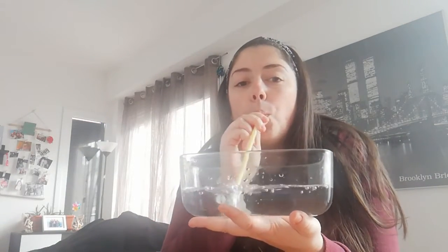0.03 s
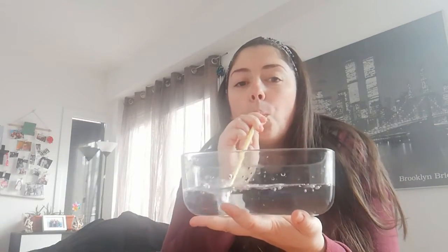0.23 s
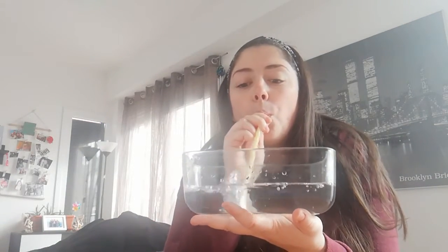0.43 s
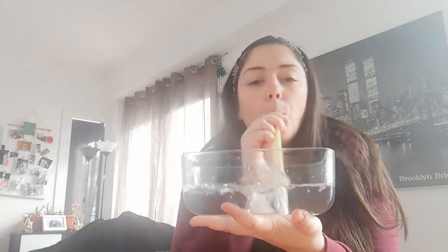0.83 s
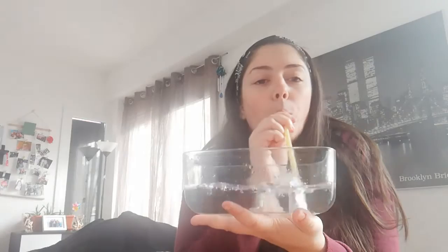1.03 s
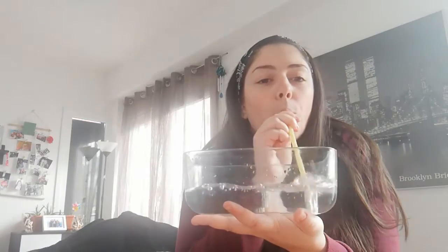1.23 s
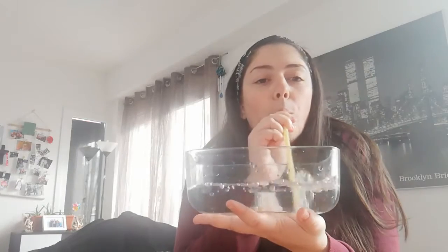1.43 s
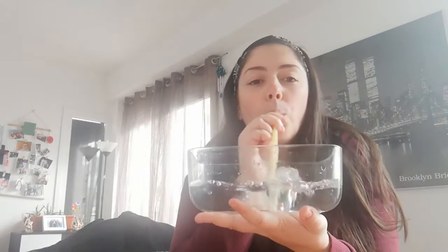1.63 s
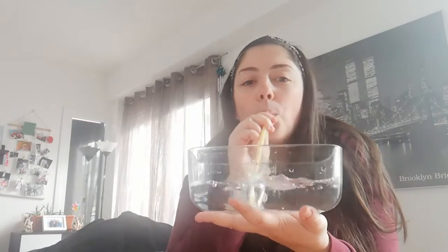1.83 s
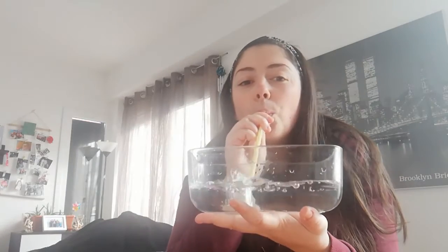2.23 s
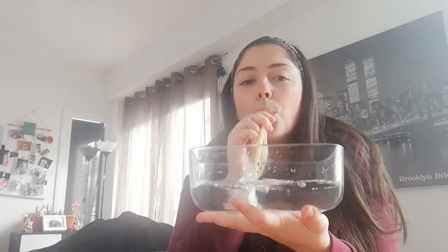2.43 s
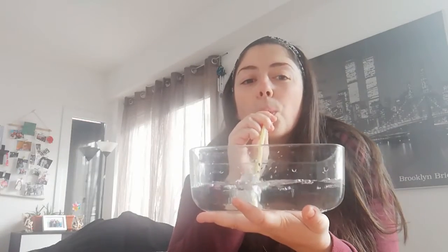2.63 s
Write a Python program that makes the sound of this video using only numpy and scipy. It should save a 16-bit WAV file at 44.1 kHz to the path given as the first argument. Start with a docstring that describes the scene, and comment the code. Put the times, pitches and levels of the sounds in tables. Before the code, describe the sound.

Bubbles blown through a straw gurgle in a bowl of water, with small splashes and ticks.

```python
"""A small living room, a stereo microphone at arm's length from a glass bowl of water with a straw in it.
From the start, air leaves the straw in big bubbles, each a low thump and a wet slap; many gulp upward in
pitch as they open at the surface. At 0.2 s the straw ticks sharply on the glass, then now and again.
The bubbling is strongest from 0.6 s to about 2 s, and eases before the last bubble at 2.7 s.
All the while tiny bubbles plink, spray crackles and the bowl rings faintly."""
import sys
import numpy as np
from scipy import signal
from scipy.fft import rfft, irfft
from scipy.io import wavfile
from scipy.ndimage import uniform_filter1d

SR = 44100
rng = np.random.default_rng(int(sys.argv[2]) if len(sys.argv) > 2 else 0)


def wav_record(signal):
    """Record a signal, one row per channel, as 16-bit PCM in the file named by sys.argv[1]."""
    frames = np.transpose(np.atleast_2d(signal))
    bounded = np.clip(frames, -1, 1)
    # unit amplitude maps onto the largest positive 16-bit level
    quanta = np.round(bounded * 32767).astype(np.int16)
    wavfile.write(sys.argv[1], SR, quanta)


N = 123479

# Levels in the tables are relative: each source adds its own trim.
# big bubbles leaving the straw (time [s], thump [dB], low slap [dB], high slap [dB])
RELEASES = [(0.06, -45, -37, -69), (0.099, -55, -70, -66), (0.149, -69, -55, -49.5),
            (0.236, -48.5, -53, -50.5), (0.31, -50, -50, -43), (0.366, -58, -42, -49),
            (0.412, -56, -57, -46.5), (0.45, -48.5, -40, -44), (0.502, -43.5, -33, -46),
            (0.549, -41, -44, -51), (0.602, -39.5, -27, -28.5), (0.663, -34.5, -25.5, -29),
            (0.729, -40.5, -24, -38.5), (0.772, -37, -40, -37), (0.848, -43.5, -27.5, -68),
            (0.927, -38, -28.5, -93), (0.997, -40, -31.5, -33), (1.073, -41.5, -25, -58),
            (1.125, -38.5, -54, -39), (1.205, -44.5, -43, -44), (1.265, -39, -21, -30),
            (1.315, -39, -53, -33.5), (1.369, -47.5, -29, -53), (1.402, -42, -27.5, -34.5),
            (1.452, -41, -36, -38.5), (1.494, -52, -48, -47.5), (1.57, -42, -36, -64),
            (1.601, -47, -26.5, -78), (1.671, -42.5, -34.5, -85), (1.716, -36, -23, -45.5),
            (1.782, -37, -31, -34.5), (1.837, -44.5, -61, -41), (1.918, -43, -33.5, -55),
            (1.997, -57, -35.5, -78), (2.04, -50.5, -43, -44.5), (2.104, -47.5, -48, -50),
            (2.131, -43.5, -33, -40), (2.167, -42.5, -44.5, -55), (2.241, -35.5, -32, -37.5),
            (2.278, -45.5, -49, -54), (2.338, -43.5, -61, -46), (2.375, -49, -63, -42.5),
            (2.424, -45.5, -62, -49), (2.472, -53, -46, -49), (2.53, -47.5, -47, -40.5),
            (2.59, -48.5, -71, -43.5), (2.619, -62, -66, -47), (2.649, -58, -68, -73),
            (2.703, -55, -43, -45.5)]
# resonances of the thump (frequency [Hz], level [dB], t60 [s])
THUMP_MODES = [(215.6,1.5,0.13),(249.2,6.5,0.053),(527,-7,0.015)]
# spectra of the low and the high slap (frequency [Hz], level [dB])
LOW_SLAP = [(150,-41),(400,-1),(570,4.5),(750,12),(1100,-3),(1600,-21),(2200,-33),(8000,-72)]
HIGH_SLAP = [(200,-27.5),(700,-0.5),(1300,12),(1650,5.5),(2100,0),(3500,-14),(6000,-11.5),(12000,-30)]
# bubbles opening at the surface (time [s], level [dB], starting pitch [Hz], t60 [s], rise [octaves])
GULPS = [(0.2855,-15.5,1118,0.012,0.41),(0.356,-30.5,1247,0.026,0.29),(0.452,-28.5,1183,0.021,0.2),(0.504,-29,1264,0.032,0.18),
         (0.6022,-7,1313,0.013,0.12),(0.613,-20,1545,0.022,0.32),(0.662,-14.5,1240,0.016,0.26),(0.729,-24.5,711,0.036,0.29),(0.776,-51,780,0.016,0.27),
         (0.8475,-18,596,0.02,0.74),(0.928,-21.5,1123,0.017,0.24),(0.9365,-20.5,890,0.024,0.43),(0.997,-46,740,0.014,0.2),(1.0755,-20.5,649,0.03,0.79),
         (1.2635,-18.5,728,0.013,0.23),(1.273,-17,890,0.03,0.23),(1.366,-34.5,950,0.034,0.3),(1.4025,-27,750,0.02,0.36),(1.571,-32,495,0.043,0.29),
         (1.604,-27,685,0.032,0.61),(1.673,-29,453,0.032,0.13),(1.685,-31.5,508,0.025,0.3),(1.7195,-20.5,692,0.03,0.61),(1.782,-45,800,0.016,0.31),
         (1.9337,-18.5,962,0.031,0.57),(1.998,-37,796,0.055,0.34),(2.028,-31.5,826,0.018,0.37),(2.122,-42,2050,0.031,0.26),(2.131,-32.5,1226,0.025,0.19),(2.2415,-28,1094,0.026,0.47),(2.3395,-24.5,1000,0.019,0.36),
         (2.374,-29,1160,0.02,0.24),(2.376,-40,2000,0.041,0.16),(2.419,-42,2200,.025,.15),(2.481,-34,1147,0.027,0.24),(2.503,-40,1540,0.046,0.14),
         (2.528,-24,1247,0.03,0.81),(2.705,-37,401,0.026,0.26)]
# straw on glass, by group of modes (time [s], lowest [dB], second [dB], middle [dB], upper [dB], top [dB])
TICKS = [(0.0981, -50, -33.5, -50, -42, -50), (0.2008, -30, -20.5, -38.5, -51, -29.5),
         (0.5001, -22, -40, -66, -50, -47), (0.6601, -33.5, -42, -53, -62, -42.5),
         (1.1962, -27, -44, -50, -49, -51), (2.2414, -33, -38, -44, -57, -47)]
# borders between those groups (frequency [Hz])
GROUP_EDGES_HZ = [3000, 4000, 6000, 8250]
# modes of straw and glass (frequency [Hz], level [dB], base t60 [s], detuning by sloshing water [share])
TICK_MODES = [(2308,-19,0.12,0.0143),(2772,-3,0.075,0.0043), (3394,0,.04,0),(3500,-7,.012,.02),
              (4840,-12.5,0.057,0.0071),(4870,11,0.027,0.002),(5100,-37,0.019,0.034),
              (7900,7,0.032,0.024),(8550,-14,0.038,0.0054),(8890,0,0.024,0.0375),(9340,-6,0.021,0),(10150,0,0.0086,0.0084)]
# spectrum of the crack at contact (frequency [Hz], level [dB])
CRACK = [(2000,-43),(3500,12),(6000,3),(8800,6),(10300,1),(11000,-2),(15500,-9)]
# tiny bubbles bursting (time [s], level [dB], mid-chirp pitch [Hz], t60 [s])
PLINKS = [(0.06, -41.5, 5170, 0.032), (0.2004, -11.5, 10050, 0.0056), (0.202, -20.5, 8650, 0.026),
          (0.2811, -37, 3497, 0.043), (0.4113, -44, 6440, 0.016), (0.4552, -31.5, 3380, 0.025),
          (0.5481, -35, 3420, 0.027), (0.6267, -31.5, 3320, 0.018), (0.663, -35, 4490, 0.023),
          (0.724, -40, 8060, 0.063), (0.7762, -34, 7500, 0.018), (0.7777, -24, 3370, 0.016),
          (0.7848, -42.5, 4800, 0.037), (0.8375, -43.5, 3515, 0.041), (1.0009, -43.5, 4880, 0.026),
          (1.0846, -36.5, 8040, 0.026), (1.083, -40.5, 7700, 0.019), (1.1997, -41, 7900, 0.025),
          (1.227, -40, 7070, 0.035), (1.3294, -37, 8300, 0.027), (1.4491, -34, 3393, 0.025),
          (1.45, -47, 4590, 0.031), (1.4956, -36, 3360, 0.025), (1.4982, -28, 8200, 0.018),
          (1.56, -38, 7060, 0.039), (1.7346, -41.5, 3500, 0.027), (1.7936, -38.5, 3460, 0.02),
          (1.841, -32.5, 3540, 0.013), (1.8415, -30.5, 8140, 0.014), (1.9278, -40, 5040, 0.015),
          (2.0475, -46, 7890, 0.043), (2.0974, -39.5, 7900, 0.036), (2.13, -43, 3420, 0.048),
          (2.1636, -38.5, 3340, 0.026), (2.2416, -36, 4750, 0.018), (2.2788, -37.5, 8100, 0.026),
          (2.3716, -39.5, 4820, 0.026), (2.3724, -53, 3400, 0.019), (2.418, -40, 3260, 0.045),
          (2.4367, -45, 6070, 0.03), (2.4731, -44.5, 6450, 0.033), (2.5853, -40, 3430, 0.029),
          (2.6026, -41.5, 8000, 0.035), (2.6194, -43, 3430, 0.037), (2.647, -33, 3300, 0.014),
          (2.7036, -40, 3640, 0.015)]
# spray landing (time [s], high treble [dB], low treble [dB])
SPATTERS = [(0.056, -41, -42), (0.1976, -27, -36), (0.4035, -44, -43), (0.5122, -39, -52),
            (0.663, -30, -42), (0.7874, -41, -44), (1.0015, -37.5, -52.5), (1.215, -37, -48),
            (1.264, -35.5, -59), (1.314, -31.5, -42), (1.368, -42, -69), (1.449, -37.5, -39),
            (1.495, -43.5, -46), (1.673, -38.5, -46), (1.786, -43, -45), (1.833, -33, -39.5),
            (1.97, -35, -84), (2.164, -34.5, -44.5), (2.243, -45, -62), (2.2702, -37.5, -38),
            (2.3696, -41, -43), (2.424, -44, -41), (2.474, -39.5, -47), (2.522, -40.5, -75),
            (2.604, -42, -43), (2.643, -46, -45.5), (2.704, -42, -51.5)]
# spectra of its low and high treble (frequency [Hz], level [dB])
SPATTER_LOW = [(1500,2),(3000,9.5),(4900,9.5),(6500,3.5),(8000,-10),(12000,-32)]
SPATTER_HIGH = [(3000,-42),(6500,-13),(8200,3.5),(9300,5),(10300,-6),(11000,-9),(15000,-27)]
# course of the fizz and the falling drops (time [s], level [dB])
SPRAY_LEVEL = [(0.0, -46.5), (0.08, -53), (0.46, -54.5), (0.65, -55.5), (0.83, -60.5), (1.04, -59.5),
               (1.18, -50.5), (1.41, -52.5), (1.61, -61), (1.8, -55.5), (2.2, -60.5), (2.34, -53),
               (2.52, -55.5), (2.7, -53.5), (2.8, -88)]
# spectra of the fizz and of the drops (frequency [Hz], level [dB])
FIZZ = [(1180, -6), (2000, 4.5), (2590, -11), (2680, -5), (2790, 4), (3020, -6.5), (3400, 6), (3940, -6.5),
        (4750, -0.5), (5450, -5), (7480, 3), (8080, 4.5), (9110, 1), (10800, -17), (15500, -25)]
DROPS = [(2500,10),(3400,2.5),(6000,0),(8500,-1.5),(10000,-19),(11500,-8),(15000,-36)]
# course of the crowd of small bubbles (time [s], level [dB])
CHURN_LEVEL = [(0.0, -44), (0.3, -103), (0.41, -53.5), (0.58, -38), (0.68, -35.5), (0.8, -45.5),
               (1.06, -50), (1.64, -57.5), (1.85, -39.5), (2.07, -56.5), (2.24, -37), (2.44, -44.5),
               (2.67, -46.5), (2.8, -59.5)]
# spectrum of that crowd (frequency [Hz], level [dB])
CHURN = [(400,-6.5),(700,-2),(1000,-6.5),(1350,2.5),(1800,-8.5),(2600,0),(4000,-20.5)]
# the bowl's modes, shaken by the water (frequency [Hz], level [dB], t60 [s])
BOWL_MODES = [(561,-8,0.092),(739.5,-0.5,0.19), (909,-2,.55),
              (1180,-34,0.37),(1176,-49,0.099),(1323,-7.5,0.26),(1300,-2,0.36),(1380,-40,0.18),(1500,-27,0.073),(1643,-37,0.11),(1914,-13.5,0.22)]
# echoes off near walls (left delay [s], left level [dB], right delay [s], right level [dB])
ECHOES = [(.0042,-10,0.0036,-9.5),(.0092,-12.5,0.0088,-2.5),(0.0143,-8.5,0.017,-16.5),(0.022,-12.5,0.02,-12.5)]
# decay of the room's tail (frequency [Hz], t60 [s])
ROOM_T60 = [(200,0.23),(800,0.45),(2000,0.21),(6000,0.34),(14000,0.27)]
# spectra of the tail and of the room tone (frequency [Hz], level [dB])
ROOM_TAIL = [(120,-51),(250,-10),(600,0),(1300,-2.5),(3000,-2),(8000,-.5),(14000,-1)]
ROOM_TONE = [(20,1),(55,0),(120,-4),(300,-1),(1000,-67),(4000,-32),(15000,-27)]

SIDES = np.array([[1], [-1]])  # left, right
SIDE_LAG_S = .00002  # scale of the random lag between the channels


def releases():
    """Each bubble breaks off the straw with a short low thump, and the water slaps shut behind it."""
    s, thump_db, low_db, high_db = np.transpose(RELEASES)
    t = np.arange(SR // 6) / SR
    attack_s, low_cut_hz = 0.00099, 195.6
    thump = sum(amp(db - 60 * t / t60) * np.sin(2 * np.pi * hz * t) for hz, db, t60 in THUMP_MODES)
    thump *= 1 - np.exp(-t / attack_s)
    out = signal.fftconvolve(clicks(s, amp(thump_db - 2.5)), thump)[:N]
    for db, spectrum in ((low_db - 7, LOW_SLAP), (high_db, HIGH_SLAP)):
        out += bursts(s, db, spectrum, attack_s=0.00086, decay_s=0.0081)[0]
    return signal.sosfilt(signal.butter(4, low_cut_hz, "high", fs=SR, output="sos"), out)


def gulps():
    """An opening bubble rings briefly while its pitch climbs and its level flutters."""
    out, t = np.zeros(N + SR), np.arange(SR // 8) / SR
    attack_s, rise_s, overtone_ratio = 0.0024, 0.013, 1.7
    for s, db, hz, t60, octaves in GULPS:
        pitch = hz * 2 ** (octaves * (1 - np.exp(-t / rise_s)))
        phase = 2 * np.pi * np.cumsum(pitch) / SR
        flutter_db = 1.8 * flicker(span_s=.004, size=len(t))
        envelope = (1 - np.exp(-(t / attack_s) ** 2)) * amp(db + 3 - 60 * t / t60 + flutter_db)
        i = int(s * SR)
        out[i:i + len(t)] += envelope * (np.sin(phase) + amp(-30.5) * np.sin(overtone_ratio * phase))
    return out[:N]


def straw_ticks():
    """The straw cracks against the glass and rings the modes, which radiate unevenly to the two sides."""
    s, *group_db = np.transpose(TICKS)
    hz, db, t60, wander = np.transpose(TICK_MODES)
    attack_s, typical_db, db_per_doubling, pan_spread_db = 0.0019, -36, 22, 1.5
    levels = np.array(group_db)[np.searchsorted(GROUP_EDGES_HZ, hz)].T + db + 2.5
    chance = rng.standard_normal((len(s), 4, len(hz)))
    out, t = np.zeros((2, N + SR)), np.arange(SR // 6) / SR
    for start, level, (pan, lag, detune, phase) in zip(s, levels, chance):
        # after a harder knock the steady modes ring longer; the water keeps the others short
        ring_s = t60 * 2 ** ((wander == 0) * (level.max() - typical_db) / db_per_doubling)
        envelopes = amp(-60 * t / ring_s[:, None]) * (1 - np.exp(-t / attack_s))
        pitch = hz * (1 + wander * detune)
        i = int(start * SR)
        for channel, side in enumerate((1, -1)):
            lagged_t = t + side * SIDE_LAG_S * lag[:, None]
            waves = np.sin(2 * np.pi * pitch[:, None] * lagged_t + np.pi * phase[:, None])
            out[channel, i:i + len(t)] += amp(level + side * pan * pan_spread_db / 2) @ (envelopes * waves)
    crack_db = typical_db + 1.13 * (group_db[-1] - typical_db) + 9.5  # follows the top group
    return out[:, :N] + bursts(s, crack_db, CRACK, attack_s=.0004, decay_s=.002, channels=2)


def plinks():
    """Tiny bubbles burst at the surface, each a short, rough upward chirp a little to one side."""
    out, t = np.zeros((2, N + SR)), np.arange(SR // 16) / SR
    attack_s, rise_octaves, rise_s, pan_spread_db = 0.0011, .13, .005, 2.5
    glide = 2 ** (rise_octaves * (.5 - np.exp(-t / rise_s)))
    for (s, db, hz, t60), (pan, lag) in zip(PLINKS, rng.standard_normal((len(PLINKS), 2))):
        flutter_db = 3.5 * flicker(span_s=.0008, size=len(t))
        envelope = (1 - np.exp(-(t / attack_s) ** 2)) * amp(db + 3.5 - 60 * t / t60 + flutter_db)
        phase = 2 * np.pi * hz * (np.cumsum(glide) / SR + SIDES * SIDE_LAG_S * lag / 2)
        i = int(s * SR)
        out[:, i:i + len(t)] += amp(SIDES * pan * pan_spread_db / 2) * envelope * np.sin(phase)
    return out[:, :N]


def spatters():
    """Thrown-up water lands as a brief shower of tiny wet specks."""
    s, high_db, low_db = np.transpose(SPATTERS)
    out = 0
    for db, spectrum in ((low_db - 2, SPATTER_LOW), (high_db - 7, SPATTER_HIGH)):
        shower = np.array([wet_specks(per_s=9000, spread_db=2.5) for _ in range(2)])
        out += swell(s, db, attack_s=0.0006, decay_s=0.013) * coloured(shower, spectrum)
    return out


def fizz():
    """Bursting films and fine spray, scattered across the surface in clumps."""
    left, right, middle = (wet_specks(per_s=8000 / 3, spread_db=2.6) for _ in range(3))
    clumps = amp(2.2 * flicker(span_s=.012, size=N))
    specks = np.array([left + middle, right + middle]) * clumps
    return coloured(specks, FIZZ) * amp(in_time(SPRAY_LEVEL) - 2.5)


def droplets():
    """Drops of spray fall back and ping, each at its own pitch."""
    pings = crowd(np.geomspace(2600, 14000, num=36), DROPS, per_s=400, cycles=32, spread_db=11)
    return pings * amp(in_time(SPRAY_LEVEL) - 7.5)


def churn():
    """A crowd of small, quiet bubbles rings beneath the big ones."""
    bubbles = crowd(np.geomspace(450, 3600, num=24), CHURN, per_s=300, cycles=7.6, spread_db=3)
    return bubbles * amp(in_time(CHURN_LEVEL) - 11.5)


def bowl():
    """Every bubble off the straw rings the glass walls faintly, more so after a harder thump."""
    s, thump_db = np.transpose(RELEASES)[:2]
    typical_thump_db, follow_share = -33, 0.57
    level = -49 + follow_share * (thump_db - typical_thump_db)
    scatter_db = 2 * rng.standard_normal((len(s), len(BOWL_MODES))).T
    return sum(ring(clicks(s, amp(level + db + scatter)), hz, t60)
               for scatter, (hz, db, t60) in zip(scatter_db, BOWL_MODES))


def living_room(x):
    """The microphone hears the direct sound, echoes off near walls and a tail that dies band by band."""
    t, onset_s = np.arange(SR // 2) / SR, 0.0073
    response, early = np.zeros((2, 2, len(t)))
    edges_hz = np.geomspace(90, 18000, num=14)
    for low, high in zip(edges_hz, edges_hz[1:]):
        hz = np.sqrt(low * high)
        band = signal.butter(2, [low, high], "band", fs=SR, output="sos")
        noise = signal.sosfilt(band, rng.standard_normal((2, len(t))))
        tail = noise * amp(-60 * t / at_hz(ROOM_T60, hz)) * (1 - np.exp(-(t / onset_s) ** 2))
        unity_gain = np.sqrt(2 * (high - low) / SR / np.sum(tail ** 2, axis=1, keepdims=True))
        response += tail * unity_gain * amp(at_hz(ROOM_TAIL, hz))
    for left_s, left_db, right_s, right_db in ECHOES:
        early[0, int(left_s * SR)] += amp(left_db)
        early[1, int(right_s * SR)] += amp(right_db)
    response += signal.sosfilt(signal.butter(1, 400, "high", fs=SR, output="sos"), early)
    return x + signal.fftconvolve(x, response, axes=1)[:, :N]


def room_tone():
    """The room's low, quiet background, almost the same in both channels."""
    mid, side = coloured(rng.standard_normal((2, N)), ROOM_TONE)
    return amp(-66.5) * (mid + amp(-39) * side * SIDES)


def amp(db):
    """Decibels to gain."""
    return 10 ** (np.asarray(db) / 20)


def rms_one(x):
    """Scale to unit rms."""
    return x / np.sqrt(np.mean(x ** 2) + 1e-20)


def in_time(rows):
    """A control curve at every sample."""
    return np.interp(np.arange(N) / SR, *np.transpose(rows))


def at_hz(points, hz):
    """Read a table on a log-frequency axis."""
    freqs, values = np.transpose(points)
    return np.interp(np.log(np.maximum(hz, 1)), np.log(freqs), values)


def coloured(x, spectrum):
    """Give a steady texture a spectrum; rms 1."""
    return rms_one(irfft(rfft(x) * amp(at_hz(spectrum, np.fft.rfftfreq(N, 1 / SR))), N))


def flicker(span_s, size):
    """A smooth random curve that changes about once per span; rms 1."""
    width = int(span_s * SR)
    return rms_one(uniform_filter1d(uniform_filter1d(rng.standard_normal(size), width), width))


def clicks(times, gains):
    """One impulse per event."""
    out = np.zeros(N)
    np.add.at(out, np.clip((np.asarray(times) * SR).astype(int), 0, N - 1), gains)
    return out


def ring(x, hz, t60):
    """A unit click sets a sine of height 1 ringing."""
    r, w = amp(-60 / (t60 * SR)), 2 * np.pi * hz / SR
    return signal.lfilter([0, np.sin(w)], [1, -2 * r * np.cos(w), r * r], x + 1e-18)


def dying(x, decay_s):
    """Each impulse becomes an exponential decay."""
    return signal.lfilter([1], [1, -np.exp(-1 / (decay_s * SR))], x + 1e-18)


def swell(s, db, attack_s, decay_s):
    """An attack and a decay for each event."""
    hits = clicks(s, amp(db))
    return dying(hits, decay_s) - dying(hits, 1 / (1 / decay_s + 1 / attack_s))


def bursts(s, db, spectrum, attack_s, decay_s, channels=1):
    """Short puffs of noise, coloured after their envelope so that the edges stay round."""
    colour = rms_one(amp(at_hz(spectrum, np.fft.rfftfreq(N, 1 / SR))))
    puffs = swell(s, db, attack_s, decay_s) * rng.standard_normal((channels, N))
    return irfft(rfft(puffs) * colour, N)


def grains(per_s, spread_db):
    """Random clicks, many small and a few large."""
    hits = rng.random(N) < per_s / SR
    sizes = amp(spread_db * np.minimum(rng.exponential(1, N), 5))
    return hits * sizes * rng.choice([-1, 1], N)


def crowd(pitches, spectrum, per_s, cycles, spread_db):
    """Random grains, each ringing at one of the pitches and falling 60 dB over `cycles`; rms 1."""
    hits, pitch_index = grains(per_s, spread_db), rng.integers(0, len(pitches), N)
    return rms_one(sum(ring(hits * (pitch_index == k), hz, cycles / hz)
                       * amp(at_hz(spectrum, hz)) * np.sqrt(hz) for k, hz in enumerate(pitches)))


def wet_specks(per_s, spread_db):
    """Specks of water ring for a few milliseconds, at pitches spread evenly over the treble."""
    pitches = np.linspace(1400, 15000, num=24)
    hits, pitch_index = grains(per_s, spread_db), rng.integers(0, len(pitches), N)
    return sum(ring(hits * (pitch_index == k), hz, t60=.0045) for k, hz in enumerate(pitches))


def scene():
    """Water, glass and spray, about an arm's length from the microphone."""
    water = releases() + gulps() + churn()
    spray = (fizz() + droplets() + spatters() + plinks()) * amp(-0.25 * SIDES)  # a touch to the right
    return living_room(water + spray + bowl() + straw_ticks()) + room_tone()


def record(dry):
    """A steep low-pass cuts the top above 15850 Hz."""
    return signal.sosfilt(signal.ellip(10, .3, 80, 15850, fs=SR, output="sos"), dry)


dry = scene()
out = record(dry)
wav_record(out)
```